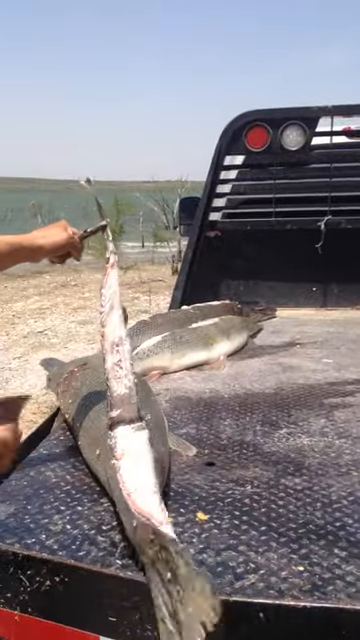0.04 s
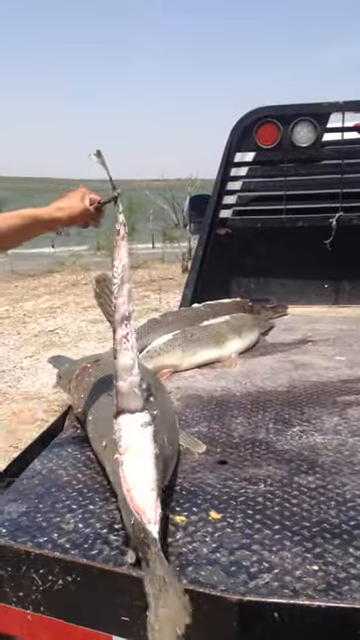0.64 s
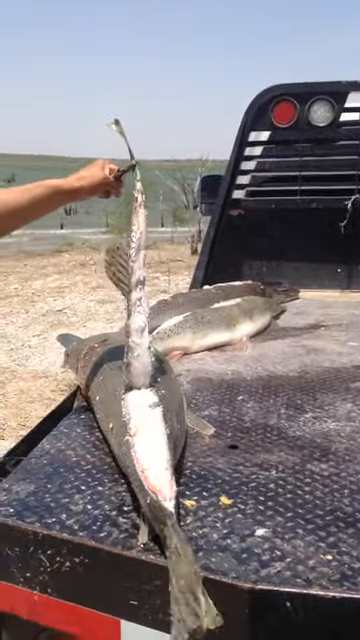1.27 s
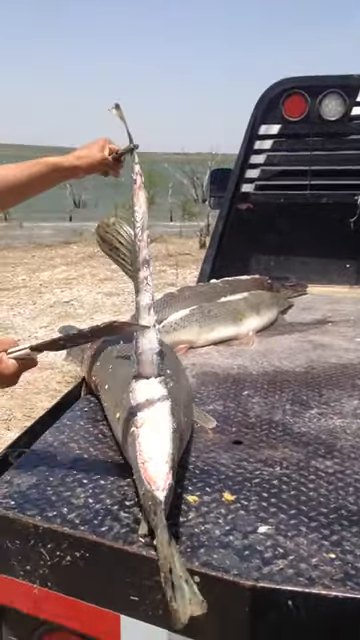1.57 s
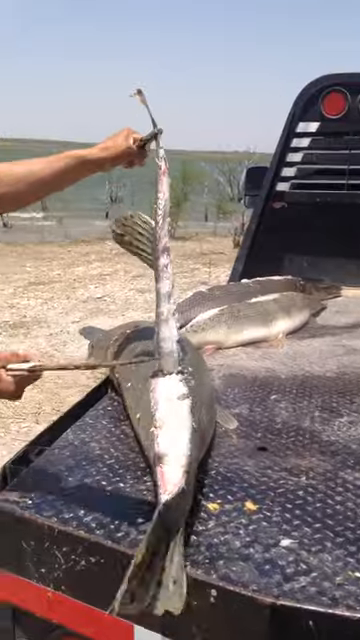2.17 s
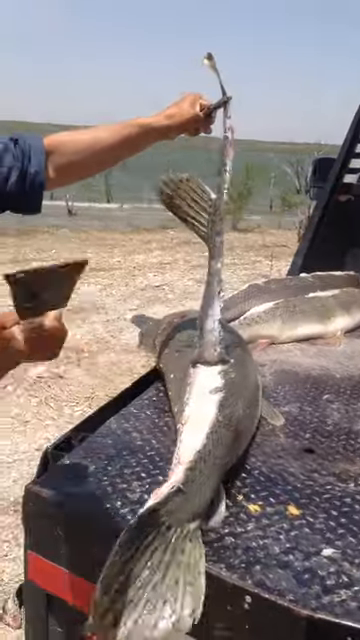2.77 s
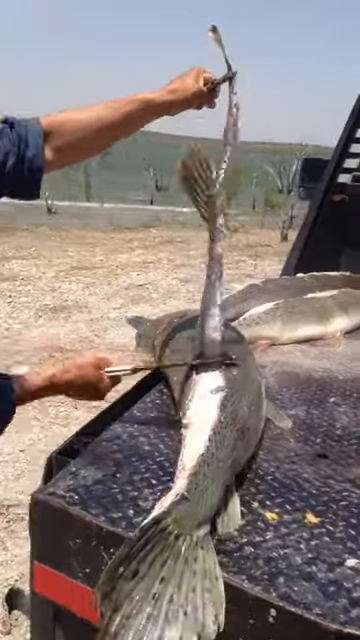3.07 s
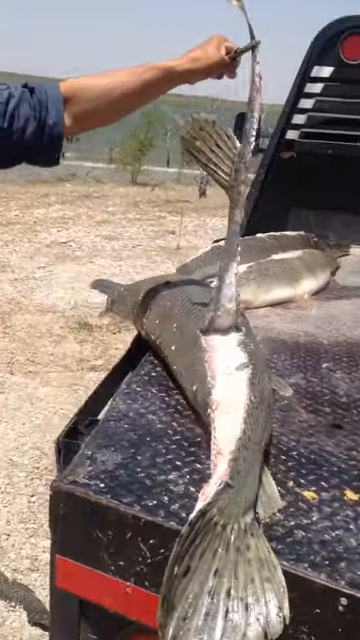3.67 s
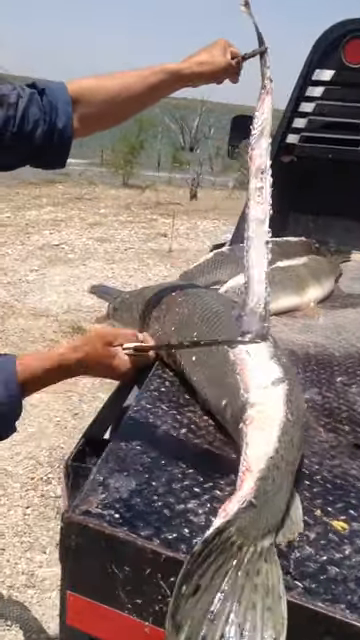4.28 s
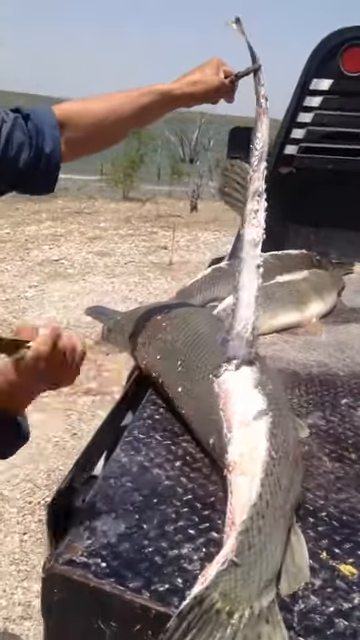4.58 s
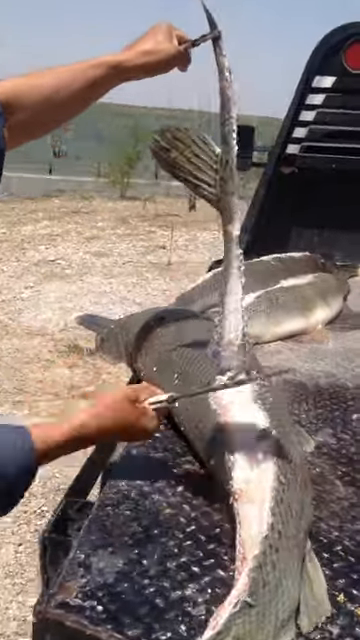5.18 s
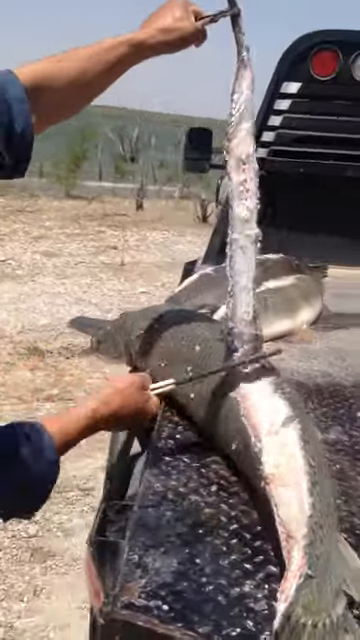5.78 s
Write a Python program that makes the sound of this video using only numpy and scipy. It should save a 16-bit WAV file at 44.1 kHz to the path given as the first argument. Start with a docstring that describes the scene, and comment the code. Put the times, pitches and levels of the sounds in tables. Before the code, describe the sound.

Outdoors, wind puffs against the microphone over a soft hiss while a knife strips the hard scales from a big fish. Ten dry, crunching clicks land a little over half a second apart, with a short break after the sixth. Faint tearing crackles come between them as the hide peels up, and the blade rings briefly on the seventh and eighth. A distant bird gives thin whistles midway and again near the end.

```python
"""Gusts drive eddies across the microphone port over an airy hiss, by a lake. Almost at once a big knife
starts stripping the armoured hide off a big fish on a flatbed truck: each chop is a few milliseconds of
cracking bony scales, thrown back by the truck, and the hide crackles as it is pulled between blows.
A small bird calls far away from the third second on. After six chops and a pause come four more,
the first two leaving the blade ringing, and the bird returns around the last."""
import sys
import numpy as np
from scipy import signal
from scipy.fft import rfft, irfft
from scipy.io import wavfile
from scipy.ndimage import uniform_filter1d, minimum_filter1d

SR = 44100
rng = np.random.default_rng(int(sys.argv[2]) if len(sys.argv) > 2 else 0)


def transcribe(u):
    """Save the signal u as a 16-bit wav file named by the first command-line argument.

    u: samples, shape (n,) or (channels, n), limited to [-1, 1]; the rate is SR.
    q: integer samples, one column per channel.
    """
    v = np.clip(np.atleast_2d(u).T, -1, 1)
    q = np.round(v * 32767).astype(np.int16)
    wavfile.write(sys.argv[1], SR, q)


N = 266187
TIME = np.arange(N) / SR
GRAZE_S = 0.01  # the edge grazes the hide this long before it bites
EDDY_HZ = 440  # typical pitch of a small eddy


def knife_blows(chop_db=1.5, blade_t60_s=0.09):
    """Every chop lands in the open air and slaps back off the truck; two leave the steel ringing."""
    # The blows. Each row: contact in seconds, bite length in seconds, split length in seconds,
    # relative level in dB, ring of the scales in Hz, then boosts of ring, body and top edge in dB.
    blows = [(0.3692, 0.0016, 0.001, -19, 4550, 4, -4, -5),
             (0.9467, 0.0046, 0.00059, -19, 5400, 4, 2.5, -4.5),
             (1.52, 0.0014, 0.0024, -18.5, 3540, 4, -2, -0.5),
             (2.069, 0.00061, 0.0048, -15.5, 5400, -1, -8, -3),
             (2.601, 0.002, 0.0014, -17.5, 4700, 4, 0.9, -2.5),
             (3.132, 0.0025, 0.00096, -17, 5400, 4.5, 2.5, -4),
             (4.1582, 0.00146, 0.0056, -20, 4360, 5.5, 17, 13),
             (4.7588, 0.00014, 0.001, -17, 5150, 4.5, 0, 3),
             (5.2964, 0.00079, 0.0052, -14.5, 5780, 7.5, 5.5, 1.5),
             (5.784, 0.0026, 0.0044, -13.5, 5510, 6, -0.6, -5.5)]
    # Echo off the steel rack behind the cab, fading as the phone moves aside.
    # Each row: time in seconds, echo gain in dB.
    echo_fade = [(0, -13), (2.6, -14.5), (4.7, -30)]
    # The ringing blade. Each row: start in seconds, pitch in Hz, level in dB.
    blade_rings = [(4.163, 5740, -28), (4.761, 5780, -31)]
    out, t = np.zeros(N), np.arange(SR // 4) / SR
    for s, *shape in blows:
        crack = undb(chop_db) * open_air(chop(*shape))
        echo_db = np.interp(s, *np.transpose(echo_fade))
        add(out, s - GRAZE_S, crack + rack_echo(crack, echo_db))
    for s, hz, db in blade_rings:
        decay = np.exp(-np.log(1000) * t / blade_t60_s)
        add(out, s, undb(db) * np.sin(2 * np.pi * hz * t) * decay)
    return out


def chop(bite_s, split_s, db, ring_hz, ring_db, body_db, edge_db, graze_db=-39, graze_rise_s=0.017,
         bite_db=-9, fade_s=0.0024, ring_width_hz=700, splinter_db=-34, splinter_s=0.018):
    """The edge grazes the hide and bites, scales split in a dense burst, and splinters go on snapping."""
    # Tone of a cracking scale. Each row: frequency in Hz, gain in dB.
    scale_tone = [(500, -36.5), (950, -23.5), (1350, -24), (1650, -26), (2100, -9.5), (2800, -12),
                  (4000, -4), (5200, 1), (6200, -5.5), (7800, -12.5), (8900, -24.5), (10200, -23),
                  (12500, -31), (14800, -37)]
    t = np.arange(SR // 12) / SR - GRAZE_S
    since_split = np.maximum(t - bite_s - split_s, 0)
    graze = undb(graze_db) * np.exp(np.minimum(t, 0) / graze_rise_s)
    force = np.select([t < 0, t < bite_s], [graze, undb(bite_db)], np.exp(-since_split / fade_s))
    split = unit(flatten(force * crackle(len(t), per_s=11000, spread_db=1.5)))
    splinter_fade = np.exp(-since_split / splinter_s) * (since_split > 0)
    splinters = unit(splinter_fade * crackle(len(t), per_s=1900, spread_db=3))

    def scales_db(hz):
        body = body_db / (1 + (hz / 3600) ** 6)  # a deeper cut moves more of the hide
        edge = edge_db * (1 - 1 / (1 + (hz / 6200) ** 10))  # a cleaner break is brighter
        ring = ring_db * bell(hz, ring_hz, ring_width_hz)
        return spectrum_db(scale_tone, hz) + body + edge + ring

    # the splinters sound at one fixed level, however loud the chop
    crack = colour(split + undb(splinter_db - db) * splinters, scales_db)
    return undb(db) * crack / np.sqrt(np.sum(crack ** 2) / (SR / 100))  # level counted over 10 ms


def rack_echo(x, db, delay_s=0.0135, low_cut_hz=8500):
    """One bright slap off the rack: its narrow steel slats return only the treble."""
    treble = signal.sosfilt(signal.butter(2, low_cut_hz, "high", fs=SR, output="sos"), x)
    echo = np.zeros(len(x))
    add(echo, delay_s, treble)
    return undb(db) * echo


def tearing_hide():
    """Fibres snap in small clusters as the strip of hide is pulled up."""
    # Rips and knife scrapes. Each row: start in seconds, length in seconds, centre in Hz,
    # width in Hz, level in dB.
    rips = [(0.555, 0.023, 6300, 2980, -59.5), (0.653, 0.031, 5700, 2490, -59.5),
            (1.188, 0.0025, 10400, 3000, -54.5), (1.68, 0.0085, 4960, 790, -49.5),
            (1.716, 0.0054, 4520, 3400, -51), (1.73, 0.02, 2620, 3000, -54), (1.852, 0.011, 5130, 600, -53),
            (1.904, 0.028, 3900, 4940, -56), (2.058, 0.0055, 5000, 1000, -48),
            (3.59, 0.022, 1930, 1000, -56), (3.738, 0.0026, 5200, 3000, -44),
            (3.755, 0.0037, 4340, 2450, -47), (3.786, 0.03, 4300, 2880, -54),
            (4.453, 0.038, 1340, 690, -56.5), (5, 0.0028, 7500, 5000, -51), (5.362, 0.013, 4080, 2500, -52)]
    out, t = np.zeros(N), np.arange(SR // 6) / SR
    for s, length_s, centre_hz, width_hz, db in rips:
        pull = bell(t, length_s / 2, length_s * 0.86)
        snaps = pull * crackle(len(t), per_s=10000, spread_db=7.5)
        rip = colour(snaps, lambda hz: -20 * np.log10(1 + ((hz - centre_hz) / width_hz) ** 2))
        add(out, s, undb(db) * rip / np.sqrt(np.sum(rip ** 2) / (length_s * SR)))
    return open_air(out)[:N]


def open_air(x, scatter_db=-23, scatter_t60_s=0.049, far_db=-36, far_t60_s=0.26):
    """Direct sound, short scatter off truck and ground, faint far tail; new each time as the phone moves."""
    t = np.arange(SR // 2) / SR
    response = (t == 0) * 1.
    for db, t60_s in ((scatter_db, scatter_t60_s), (far_db, far_t60_s)):
        tail = rng.standard_normal(len(t)) * np.exp(-np.log(1000) * t / t60_s) * (t > .003)
        response += undb(db) * tail / np.linalg.norm(tail)
    return signal.fftconvolve(x, response)


def wind(flutter_db=5.5, stream_db=-7, flicker_db=4.0):
    """Strong puffs and many weak ones hit the port over a restless flutter that follows the gusts."""
    # The strongest eddies. Each row: time in seconds, peak in dB, pitch in Hz.
    strong_eddies = [(0.0716, -21.5, 565), (0.0898, -30.5, 500), (0.1185, -31, 526), (0.1661, -32.5, 517),
                     (0.4373, -34, 350), (0.6649, -35.5, 485), (0.9002, -33, 546), (0.9098, -34, 506),
                     (1.0721, -30, 430), (1.077, -31, 505), (1.1551, -36, 450), (1.1777, -30, 320),
                     (1.3724, -19, 698), (1.4108, -31, 396), (1.5012, -31, 430), (2.8337, -35.5, 258),
                     (2.8822, -31, 227), (2.9618, -29.5, 520), (3.0206, -36.5, 383), (3.1475, -29, 620),
                     (3.3298, -31.5, 323), (3.3776, -40.5, 610), (3.4846, -33.5, 310), (3.5186, -29.5, 385),
                     (3.6256, -35.5, 644), (3.7291, -37, 470), (3.842, -35.5, 545), (3.8582, -36, 318),
                     (3.9047, -36.5, 587), (4.111, -42.5, 475), (4.3345, -38.5, 450), (4.4264, -36, 440),
                     (4.5095, -39.5, 490), (4.794, -27, 540), (4.926, -31.5, 542), (5.0777, -35, 606),
                     (5.2138, -28, 823), (5.3452, -28, 577), (5.3646, -31, 590), (5.645, -23, 493),
                     (5.759, -29, 293)]
    # Tone of the low flutter. Each row: frequency in Hz, gain in dB.
    flutter_tone = [(20, -40), (35, -19), (65, 3), (130, 4), (250, 0), (500, -19), (750, -9.5), (1100, -23),
                    (2200, -37.5), (8000, -82)]
    puffs = np.zeros(N)
    for s, db, hz in [*strong_eddies, *small_eddies()]:
        eddy = puff(db, hz)
        add(puffs, s - len(eddy) / SR / 2, eddy)
    stream = undb(stream_db) * rng.standard_normal(N)
    buffets = unit(crackle(N, per_s=140, spread_db=2.5))
    turbulence = (stream + buffets) * undb(flicker_db * wander(28))
    flutter = unit(colour(turbulence, lambda hz: spectrum_db(flutter_tone, hz)))
    return puffs + flutter * undb(gust_db(TIME) + flutter_db)


def puff(db, hz, swing_s=0.0014, wake_db=-15, wake_s=0.012, lead_s=0.0055, wake_low_hz=110,
         spit_db=-27, spit_s=0.0007):
    """One eddy crosses the port: a swing of pressure, a turbulent wake and a faint spit."""
    # Eddies near the port's pitch set it ringing and last longer.
    # In order: pitch in Hz, width in Hz, extra length as a multiple.
    port_ring = (724, 109, 1.37)
    port_hz, port_width_hz, stretch = port_ring
    t = np.arange(SR // 20) / SR - 1 / 40  # centred in 50 ms
    ring_s = swing_s * (1 + stretch * bell(hz, port_hz, port_width_hz))
    swing = bell(t, 0, ring_s) * np.cos(2 * np.pi * (hz * t + rng.random()))
    low_hz = wake_low_hz * (hz / EDDY_HZ) ** 2  # a small, high eddy leaves little bass behind
    wake_shape = np.exp(np.minimum(t / lead_s, -t / wake_s))
    wake = noise_band(len(t), low_hz, min(1.58 * hz, 950)) * wake_shape
    spit = noise_band(len(t), 880, 2030) * np.exp(-np.abs(t) / spit_s)
    return undb(db) * (swing + undb(wake_db) * wake + undb(spit_db) * spit)


def small_eddies(per_s=30, above_gust_db=17, spread_db=4.0, spread_octaves=0.31):
    """Weak eddies pass at uneven moments and hit harder in a gust."""
    count = int(per_s * N / SR)
    lag, strength, pitch = rng.uniform(-1, 1, (count, 3)).T
    s = (np.arange(count) + lag) / per_s
    peak_db = gust_db(s) + above_gust_db + spread_db * strength
    return zip(s, peak_db, EDDY_HZ * 2 ** (spread_octaves * pitch))


def gust_db(s):
    """The wind at the port rises and drops: its strength at s seconds."""
    # The gusts. Each row: time in seconds, relative level in dB.
    gusts = [(0, -61), (0.48, -71), (0.72, -65.5), (1.45, -69.5), (1.72, -83), (1.95, -81), (2.46, -62),
             (2.72, -74), (3.2, -60), (3.42, -70), (3.85, -63), (4.17, -76), (4.65, -66), (4.87, -71),
             (5.2, -58.5), (5.52, -70.5), (5.72, -58), (5.95, -76)]
    return np.interp(s, *np.transpose(gusts))


def airy_hiss(hiss_db=1.0):
    """A smooth bed of outdoor hiss swells with the breeze."""
    # Tone of the hiss. Each row: frequency in Hz, gain in dB.
    hiss_tone = [(25, -36), (80, -15), (300, -24.5), (700, -9), (1000, -4.5), (1350, -6.5), (1650, -5),
                 (2100, -2.5), (2900, -4.5), (4100, 1.5), (5200, 3.5), (6500, -6), (8200, -11.5),
                 (15000, -17.5)]
    # Swells of the breeze. Each row: time in seconds, relative level in dB.
    swells = [(0.0, -63.5), (0.25, -61), (0.59, -57), (0.82, -57.5), (3.41, -61), (3.71, -58),
              (4.65, -56.5), (4.91, -62), (5.63, -59.5), (6.04, -65.5)]
    hiss = unit(colour(rng.standard_normal(N), lambda hz: spectrum_db(hiss_tone, hz)))
    return hiss * undb(np.interp(TIME, *np.transpose(swells)) + hiss_db)


def distant_bird(bird_db=-3.0, pitch_blur=0.005):
    """Thin gliding whistles from far off, slightly blurred by the moving air."""
    # The whistles. Each row: start in seconds, length in seconds, first and last pitch in Hz,
    # relative level in dB.
    whistles = [(2.33, 0.094, 4400, 4680, -58), (2.811, 0.067, 4400, 4420, -58),
                (3.08, 0.073, 4940, 4820, -49), (3.16, 0.077, 4770, 4800, -50),
                (5.444, 0.054, 3800, 4050, -54), (5.565, .08, 3780, 4000, -56),
                (5.687, 0.12, 3750, 3720, -56.5)]
    out = np.zeros(N)
    for s, length_s, start_hz, end_hz, db in whistles:
        glide = np.linspace(start_hz, end_hz, int(length_s * SR))
        hz = glide * (1 + pitch_blur * wander(400)[:len(glide)])
        whistle = np.hanning(len(hz)) * np.sin(2 * np.pi * np.cumsum(hz) / SR)
        add(out, s, undb(db + bird_db) * whistle)
    return out


def undb(db):
    """Decibels to gain."""
    return 10 ** (np.asarray(db) / 20)


def unit(x):
    """Scale to rms 1."""
    return x / np.sqrt(np.mean(x ** 2) + 1e-18)


def add(out, s, x):
    """Mix x into out, starting at s seconds."""
    i = max(int(s * SR), 0)
    out[i:i + len(x)] += x[:max(len(out) - i, 0)]


def bell(x, centre, width):
    """Smooth hump of height 1."""
    return np.exp(-2 * ((x - centre) / width) ** 2)


def spectrum_db(points, hz):
    """Read a tone curve on a log-frequency axis."""
    points_hz, db = np.transpose(points)
    return np.interp(np.log(hz + 1), np.log(points_hz), db)


def colour(x, db_at, size=2048):
    """Minimum-phase EQ whose gain in dB is a function of frequency."""
    cepstrum = irfft(np.log(undb(db_at(np.fft.rfftfreq(size, 1 / SR)))))
    cepstrum[1:size // 2] *= 2
    cepstrum[size // 2 + 1:] = 0
    response = irfft(np.exp(rfft(cepstrum)))
    return signal.fftconvolve(x, response)[:len(x)]


def flatten(x, smooth_bins=55):
    """Even out the broad colour of a burst and keep its narrow resonances."""
    power = uniform_filter1d(np.abs(rfft(x, 2048)) ** 2, smooth_bins)
    return colour(x, lambda hz: -10 * np.log10(power / power.mean() + 1e-4))


def noise_band(count, low_hz, high_hz):
    """Noise between two frequencies, rms 1."""
    band = signal.butter(4, [low_hz, high_hz], "band", fs=SR, output="sos")
    return unit(signal.sosfilt(band, rng.standard_normal(count)))


def wander(rate_hz):
    """Smooth random drift, rms 1."""
    hold = int(SR / rate_hz)
    steps = np.repeat(rng.standard_normal(N // hold + 1), hold)[:N]
    return unit(uniform_filter1d(uniform_filter1d(steps, hold), hold))


def crackle(count, per_s, spread_db):
    """Tiny clicks of uneven size at random moments."""
    clicks = (rng.random(count) < per_s / SR) * rng.choice([-1, 1], count)
    return clicks * undb(spread_db * rng.standard_normal(count))


def scene():
    """Everything as it reaches the one microphone."""
    return (knife_blows() + tearing_hide() + wind() + airy_hiss() + distant_bird())[None]


def record(dry, ceiling=0.93, low_cut_hz=45, high_cut_hz=15350, limiter_samples=45):
    """The port colours the sound; the phone cuts deep rumble, limits the highest peaks and cuts the top."""
    # Resonances of the microphone port. Each row: centre in Hz, width in Hz, gain in dB.
    resonances = [(760, 270, 1), (1343, 320, 5.5), (5320, 105, 1.5), (9830, 130, -2.5)]
    x = colour(dry[0], lambda hz: sum(db * bell(hz, centre, width) for centre, width, db in resonances))
    x = signal.sosfilt(signal.butter(2, low_cut_hz, "high", fs=SR, output="sos"), x)
    safe_gain = ceiling / np.maximum(np.abs(x), ceiling)
    gain = uniform_filter1d(minimum_filter1d(safe_gain, limiter_samples), limiter_samples)
    high_cut = signal.ellip(8, .2, 70, high_cut_hz, fs=SR, output="sos")
    return signal.sosfilt(high_cut, x * gain)[None]


dry = scene()
out = record(dry)
transcribe(out)
```